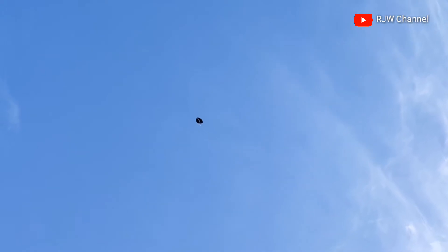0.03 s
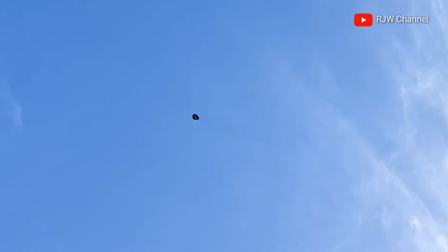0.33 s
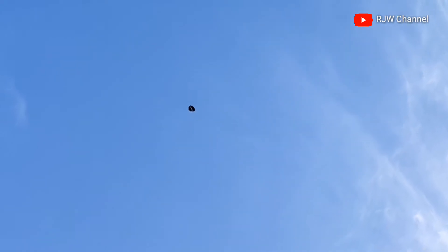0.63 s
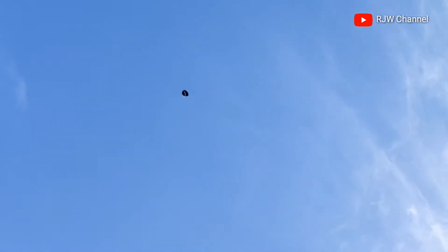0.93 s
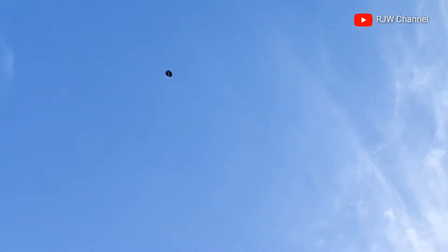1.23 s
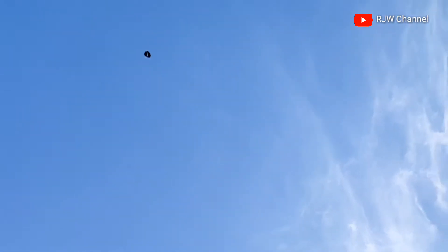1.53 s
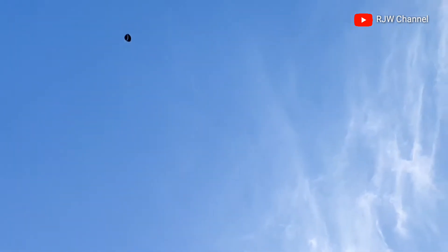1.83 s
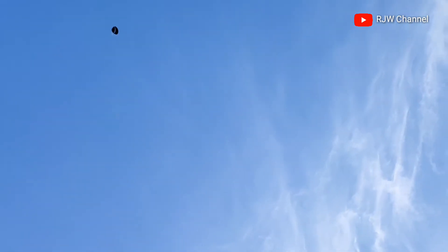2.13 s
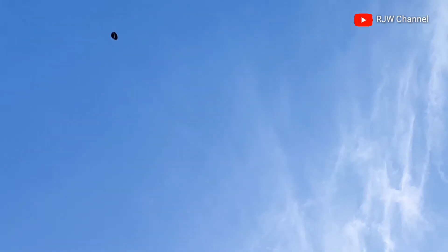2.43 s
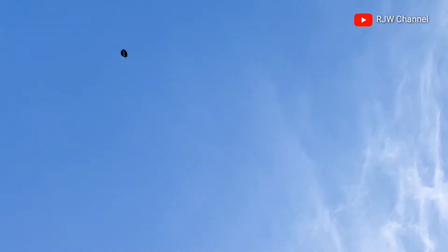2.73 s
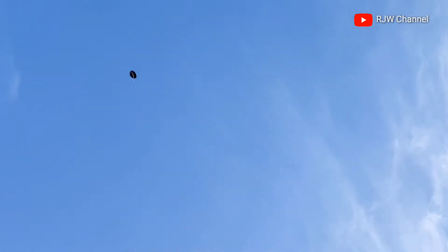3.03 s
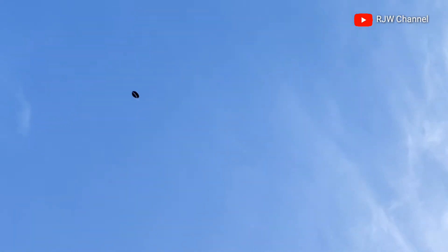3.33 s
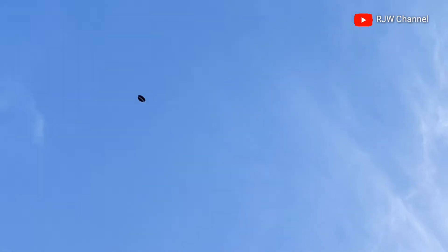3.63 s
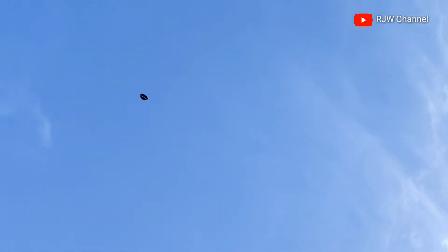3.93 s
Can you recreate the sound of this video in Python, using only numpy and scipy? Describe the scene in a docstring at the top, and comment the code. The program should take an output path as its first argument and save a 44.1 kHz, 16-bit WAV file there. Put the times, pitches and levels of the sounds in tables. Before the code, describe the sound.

Fast fluttering whoosh of a kite in flight, with low wind rumble on the microphone.

```python
"""Open ground in a gusty wind, a two-port microphone far below a rotor kite. The kite spins about
twelve times a second; each of its two edges whooshes and whistles once a turn, and the ground echoes it.
Right at the microphone, gusts buffet both ports, mostly the left, which crackles and now and then
overloads. Twice the wind whistles across the right port. A thin hiss lies over everything."""
import sys
import numpy as np
from scipy import signal
from scipy.fft import rfft, irfft
from scipy.io import wavfile
from scipy.ndimage import uniform_filter1d

SR = 44100
rng = np.random.default_rng(int(sys.argv[2]) if len(sys.argv) > 2 else 0)


def wrap_up_sound(samples):
    """Save the sound to the file named by the first command line argument, as 16-bit audio."""
    columns = np.atleast_2d(samples).T
    # keep every value between -1 and 1, then stretch to whole-number steps
    tamed = np.clip(columns, -1, 1)
    steps = np.round(tamed * 32767).astype(np.int16)
    wavfile.write(sys.argv[1], SR, steps)


N = 176400
TIME = np.arange(N) / SR

# Rotation of the kite: t/s, angle/turns
KITE_TURNS = [(0, -.53), (.4595, 5), (1.687, 20), (2.5102, 30), (4, 47.96)]
# Airspeed over the kite, heard as pitch: t/s, pitch factor
AIRSPEED_PITCH = [(0, 1), (1.1, 0.88), (1.7, 1), (2.35, 0.79), (2.7, 0.9), (3.1, 0.97), (3.6, 0.98),
                  (4, 0.96)]
# Each edge's whoosh, body and treble: place in the turn/turns, length/turns, level/dB
BODY_PASSES = [(-.015, 0.12, 9), (.475, 0.14, 6.5)]
TREBLE_PASSES = [(.01, 0.15, 5.9), (.515, 0.11, 9.9)]
# Colour of the whoosh: f/Hz, level/dB
BODY_SPECTRUM = [(300, -16.5), (600, -2), (880, 2.5), (1120, 2), (1350, -18.5), (1700, -19), (2500, -38.5)]
TREBLE_SPECTRUM = [(800, -25), (1300, -3), (1650, -2), (1950, 0), (2280, .5), (2480, -6), (2700, -13),
                   (3300, -12.5), (4200, -26), (7000, -36)]
# Swell of the whoosh: t/s, level/dB
BODY_LEVEL = [(0, -38.5), (.2, -43.5), (.55, -47.5), (.8, -45), (1.15, -44.5), (1.3, -48), (1.45, -49.5),
              (1.72, -49), (1.9, -47.5), (2.1, -42.5), (2.4, -46.5), (2.62, -37), (2.95, -46), (3.2, -40),
              (3.55, -38), (3.8, -43.5), (4, -41.5)]
TREBLE_LEVEL = [(0, -47.5), (.2, -49.5), (0.549, -58.5), (.8, -51), (1.301, -55.5), (1.45, -50),
                (1.75, -60.5), (2.1, -47.5), (2.62, -52), (2.95, -50), (3.199, -48.5), (3.55, -50),
                (4, -62.5)]
# Edge whistles, two on the second edge: place/turns, length/turns, top f/Hz at pitch factor 1,
# pitch arch/turns^-2, fuzz width/Hz, level/dB, octave/dB, relative pitch wander, level spread/dB
EDGE_WHISTLES = [(-.03, .095, 1145, 7.5, 190, 2, -21, .008, 1),
                 (.475, .085, 1215, 5, 320, -2.5, -27, .015, 1),
                 (.475, .06, 1420, 6, 300, -14, -35, .04, 3)]
# Swell of the edge whistles: t/s, level/dB
EDGE_WHISTLE_LEVEL = [(0, -51), (1.15, -51), (1.7, -56.5), (2.25, -46), (2.6, -36), (2.8, -39.5),
                      (3.0, -32), (3.17, -29), (3.32, -34.5), (3.51, -26.5), (3.6, -34), (3.76, -36),
                      (4, -45.5)]
# Kite to left and right port: gain/dB, direct delay/ms, ground echo delay/ms, ground echo/dB
PORT_PATHS = [(0, 0.09, 8.33, -6), (-4.5, 0, 5.5, -9)]

# Wind pressure on each port: t/s, level/dB
LEFT_GUSTS = [(0.0, -14), (0.04, -9.5), (0.05, -12), (0.16, -8), (0.24, -13), (0.55, -8.5), (0.61, -13),
              (0.64, -11.5), (0.67, -21), (0.7, -15.0), (0.8, -28.5), (0.87, -14), (0.92, -27.5),
              (1.0, -18.5), (1.03, -45), (1.08, -12), (1.12, -34), (1.14, -25.5), (1.2, -37.5), (1.27, -22),
              (1.3, -30), (1.35, -23), (1.39, -20.5), (1.42, -11.5), (1.45, -23.5), (1.5, -15.5),
              (1.58, -15), (1.62, -13), (1.67, -14.5), (1.69, -12), (1.77, -20.5), (1.78, -14.5),
              (1.82, -10), (1.84, -18), (1.95, -16), (2.0, -20.5), (2.15, -14), (2.23, -18.5), (2.35, -9.5),
              (2.39, -19), (2.47, -14.5), (2.6, -24), (2.67, -8.5), (2.72, -6), (2.75, -11.5), (2.78, -8.5),
              (2.94, -10), (3.09, -8.5), (3.11, -22), (3.14, -11.5), (3.23, -24.5), (3.25, -12.5),
              (3.33, -25.5), (3.36, -14.5), (3.44, -16.5), (3.56, -3.5), (3.64, -11.5), (3.68, -17.5),
              (3.79, -12.5), (3.81, -18), (3.86, -9.5), (3.99, -12.5)]
RIGHT_GUSTS = [(0.0, -27), (0.22, -31), (0.27, -20), (0.48, -20), (0.59, -32), (0.7, -17.5), (0.81, -32.5),
               (0.89, -10.5), (0.92, -28.5), (1.06, -12), (1.12, -29), (1.17, -24.5), (1.19, -19),
               (1.23, -21.5), (1.7, -18), (1.74, -23), (1.81, -14), (1.95, -13), (2.02, -24.5), (2.06, -13),
               (2.12, -19.5), (2.16, -8), (2.21, -22.5), (2.28, -23), (2.31, -32), (2.4, -16), (2.53, -39),
               (2.57, -19.5), (2.73, -23), (2.76, -31), (2.86, -12.5), (3.14, -14.5), (3.26, -30),
               (3.47, -22), (3.68, -33.5), (3.73, -19), (3.81, -19.5), (3.85, -56), (3.88, -19),
               (3.99, -38)]
# Colour of the buffeting: f/Hz, level/dB
LEFT_BUFFET_SPECTRUM = [(20, -18.5), (40, -38), (65, -30), (90, -2), (125, 3), (180, 0), (250, -3.5),
                        (350, -8.5), (500, -15), (700, -25), (1000, -36.5), (1500, -63.5), (3200, -68),
                        (7000, -78)]
RIGHT_BUFFET_SPECTRUM = [(20, -22.5), (40, -17.5), (65, -20.5), (90, -2), (125, 6.5), (180, -5.5),
                         (250, -6.5), (350, -12), (500, -19.5), (700, -31), (1000, -38.5), (1500, -48.5),
                         (3200, -68.5), (7000, -77.5)]
# Hard slaps of air on the left port: t/s, signed height, half length/ms, relative crackle/dB
AIR_SLAPS = [(.038, -0.96, 0.53, -26), (.0932, 0.82, 0.47, -12), (0.1445, 1, 0.47, -6.5),
             (0.1721, -0.95, 0.73, -2), (.3747, -1.24, 0.43, -6), (0.4845, 1.1, 0.67, -1),
             (0.5084, 1.07, 0.49, -5), (0.5497, 0.99, 0.66, -25), (2.7131, -0.78, 0.45, -15),
             (2.7157, 0.97, 0.46, -14), (2.7255, -1.36, 0.68, -14), (2.7749, 0.99, 0.39, -1.5),
             (2.7965, -1.2, 0.73, -8), (3.5219, -0.9, .8, -13), (3.566, -1.2, 0.72, -9),
             (3.5743, -1.17, 0.67, -5.5), (3.6041, 1.03, 0.62, -22), (3.6335, 0.74, 0.48, -11),
             (3.6373, -1.5, 0.84, -7), (3.6641, 1.26, 0.44, -0.5)]
# Colour of the crackle: f/Hz, level/dB
CRACKLE_SPECTRUM = [(300, 3.5), (1200, 6), (2000, -2.5), (3500, -18.5), (5500, -28), (7500, -28)]
# Wind across the right port, one table a whistle: t/s, f/Hz, level/dB
PORT_WHISTLES = [
    [(2.465, 325, -27), (2.492, 344, -17.5), (2.515, 316, -20), (2.528, 283, -12.5), (2.545, 318, -20),
     (2.575, 328, -32)],
    [(3.235, 319.5, -29), (3.258, 313, -12.5), (3.29, 314.7, -20.5), (3.32, 296.6, -23.5),
     (3.34, 256, -21.5), (3.36, 305, -14.5), (3.38, 323, -25.5), (3.43, 281, -24)],
]

# Colour of the hiss at each port: f/Hz, level/dB
LEFT_HISS_SPECTRUM = [(300, -3), (1300, -5.5), (2300, -8.5), (2800, -6.5), (3600, -14), (4400, -10),
                      (5400, -4.5), (5700, -5.5), (6100, 0.5), (6800, 4.5), (7400, -2), (7800, -12)]
RIGHT_HISS_SPECTRUM = [(300, 14), (1300, 7.5), (2300, -15), (2800, -12.5), (3600, -20.5), (4300, -21.5),
                       (5000, -16), (5700, -9.5), (6100, -7), (6800, -0.5), (7400, -1.5), (7800, -17.5)]
# Swell of the whole hiss, and of its lower treble against the rest: t/s, level/dB
HISS_SWELL = [(0, -47.5), (.5, -47.5), (.7, -47.5), (1.48, -50), (1.56, -46.5), (1.9, -43), (2.4, -49),
              (2.7, -51.5), (3.05, -50), (3.55, -45.5), (3.71, -55.5), (4, -50.5)]
HISS_LOWER_TREBLE = [(0, 6), (.55, -2.5), (1.48, 1.5), (1.56, -12.5), (2.5, -3.5), (2.6, 5), (3.1, -0.5),
                     (3.6, -2.5), (4, -5.5)]


def kite():
    """The kite from the ground: a fluttering whoosh, with a whistle that swells out of it."""
    body = from_afar(whoosh(BODY_PASSES, BODY_SPECTRUM, BODY_LEVEL), scatter_db=0.5)
    treble = mottled(whoosh(TREBLE_PASSES, TREBLE_SPECTRUM, TREBLE_LEVEL))
    treble = from_afar(treble, scatter_db=-8) * amp([[-1.5], [0]])  # duller on the left
    return body + treble + from_afar(edge_whistle(), scatter_db=-11.5)


def whoosh(passes, spectrum, level, spread_db=1):
    """A short rush of turbulence from each edge, once a turn."""
    swings = sum(amp(db) * swing(place, length) for place, length, db in passes)
    return unit(noise(spectrum) * swings * amp(spread_db * drift(8.9))) * amp(curve(level))


def mottled(treble, depth_db=2.2):
    """The whoosh's treble takes another colour on every pass."""
    bands = signal.stft(treble, SR, nperseg=512)[2]
    patches = uniform_filter1d(rng.standard_normal(bands.shape), size=3, axis=0)
    patches = unit(uniform_filter1d(patches, size=5, axis=1))
    return signal.istft(bands * amp(depth_db * patches), SR, nperseg=512)[1][:N]


def edge_whistle(wander_hz=20, lead_turns=0.015, octave_spread_db=3.5):
    """Each edge sheds vortices: a fuzzy tone that rises and falls with the swing, no two turns alike."""
    out, speed = np.zeros(N), curve(AIRSPEED_PITCH)
    for place, length, top_hz, arch, width_hz, db, octave_db, wander, spread_db in EDGE_WHISTLES:
        waver = 1 + wander * drift(wander_hz) + .025 * drift(203)
        hz = top_hz * speed * waver / (1 + arch * (turns_from_pass(place) + lead_turns) ** 2)
        phase = 2 * np.pi * np.cumsum(hz) / SR
        fuzz = drift(width_hz / 2) * np.cos(phase) + drift(width_hz / 2) * np.sin(phase)
        octave = amp(octave_db + octave_spread_db * drift(wander_hz)) * np.sin(2 * phase)
        tone = np.sin(phase) + .65 * fuzz + octave
        out += tone * swing(place, length) * amp(db + spread_db * drift(wander_hz))
    return unit(out) * amp(curve(EDGE_WHISTLE_LEVEL))


def swing(place, length):
    """Loudness of an edge as it comes round."""
    return np.exp(-.5 * abs(turns_from_pass(place) / length) ** 2.4)


def turns_from_pass(place):
    """Turns since (or until) an edge swings through the wind."""
    return (curve(KITE_TURNS) - place + .5) % 1 - .5


def from_afar(source, scatter_db, t60_s=0.039):
    """The kite reaches each port directly, off the ground, and scattered by the surroundings."""
    t, ports = TIME[:SR // 2], []
    for gain_db, direct_ms, ground_ms, ground_db in PORT_PATHS:
        tail = rng.standard_normal(len(t)) * amp(-60 * t / t60_s)
        scatter = amp(scatter_db) * signal.fftconvolve(source, tail / np.linalg.norm(tail))[:N]
        ground_echo = amp(ground_db) * delayed(source, ground_ms)
        ports.append(amp(gain_db) * (delayed(source, direct_ms) + ground_echo + scatter))
    return np.array(ports)


def buffeting(gusts, spectrum, gain_db, eddy_db=3.5, eddy_hz=50.7, usual_gust_db=-12.5):
    """Lumpy turbulence right on one port; stronger gusts are brighter."""
    level = curve(gusts)
    eddies = rng.standard_normal(N) * amp(eddy_db * drift(eddy_hz))
    hz, t, bands = signal.stft(eddies, SR, nperseg=2048)
    octaves = np.clip(np.log2((hz + 1) / 140), -2, 2)[:, None]  # the colour tilts about 140 Hz
    tilt_db = 0.22 * octaves * (np.interp(t, TIME, level) - usual_gust_db)
    rumble = signal.istft(bands * amp(colour(spectrum, hz)[:, None] + tilt_db), SR, nperseg=2048)[1][:N]
    steady = rumble / np.sqrt(uniform_filter1d(rumble ** 2, size=1800) + 1e-20)
    return saturate(steady * amp(level + gain_db))


def saturate(pressure, limit=.93, knee=6):
    """The microphone gives way, rounding off the strongest swings."""
    return pressure / (1 + abs(pressure / limit) ** knee) ** (1 / knee)


def slapped(rumble, spit_db=-27, spit_ms=1.8):
    """Single sharp pressure swings break into the rumble, each with a spit of crackle."""
    out, spit = rumble, np.zeros(N)
    for at_s, height, half_ms, crackle_db in AIR_SLAPS:
        ms = (TIME - at_s) * 1000
        near = abs(ms) < 30
        u = ms / half_ms
        grip = near * np.exp(-u ** 2 / 4)  # how far the slap displaces the rumble
        out = out * (1 - grip) + height * (1 - .5 * u ** 2) * grip
        spit[near] += amp(crackle_db) * np.exp(-abs(ms[near]) / spit_ms)
    return out + amp(spit_db) * spit * noise(CRACKLE_SPECTRUM)


def port_low_cut(rumble, hz=42):
    """The port passes little of the deepest rumble."""
    return signal.sosfiltfilt(signal.butter(2, hz, "highpass", fs=SR, output="sos"), rumble)


def crackle(rumble, threshold=.5, level_db=-28):
    """The crests of strong buffeting tear into fine crackle."""
    crests = np.clip((abs(rumble) - threshold) / (1 - threshold), 0, 1)
    return amp(level_db) * crests * noise(CRACKLE_SPECTRUM)


def port_whistle(octaves_db=(-13.5, -27), waver=0.0246):
    """Wind across the right port: a wavering edge tone with a weak octave."""
    out = np.zeros(N)
    for whistle, octave_db in zip(PORT_WHISTLES, octaves_db):
        phase = 2 * np.pi * np.cumsum(curve(whistle) * (1 + waver * drift(80))) / SR
        tone = unit(np.sin(phase) + amp(octave_db) * np.sin(2 * phase))
        sounding = uniform_filter1d(1. * ((TIME > whistle[0][0]) & (TIME < whistle[-1][0])), size=300)
        out += sounding * amp(curve(whistle, column=2)) * tone
    return out


def hiss(patchy_db=3.5, lower_hz=3670, lower_octaves=0.69):
    """Thin, patchy background hiss, unrelated between the ports."""
    ports = np.array([noise(LEFT_HISS_SPECTRUM), amp(0.5) * noise(RIGHT_HISS_SPECTRUM)])
    hz, t, bands = signal.stft(ports, SR, nperseg=1024, noverlap=768)
    patches = uniform_filter1d(rng.standard_normal(bands.shape), size=5, axis=1)
    patches = unit(uniform_filter1d(patches, size=25, axis=2))
    lower_treble = np.exp(-.5 * (np.log2((hz + 1) / lower_hz) / lower_octaves) ** 2)[:, None]
    bands *= amp(patchy_db * patches + lower_treble * np.interp(t, TIME, curve(HISS_LOWER_TREBLE)))
    return signal.istft(bands, SR, nperseg=1024, noverlap=768)[1][:, :N] * amp(curve(HISS_SWELL))


def amp(db):
    """Decibels to gain."""
    return 10 ** (np.asarray(db) / 20)


def unit(x):
    """Scales to rms 1."""
    return x / np.sqrt(np.mean(x ** 2) + 1e-20)


def curve(points, column=1):
    """One column of a time table at every sample."""
    table = np.transpose(points)
    return np.interp(TIME, table[0], table[column])


def colour(points, hz):
    """Reads a spectrum on a log-frequency axis."""
    f, db = np.transpose(points)
    return np.interp(np.log(hz + 1), np.log(f + 1), db)


def noise(spectrum):
    """Steady noise of a given colour."""
    gain = amp(colour(spectrum, np.fft.rfftfreq(N, 1 / SR)))
    return unit(irfft(rfft(rng.standard_normal(N)) * gain, N))


def drift(hz):
    """Random wander up to about a given rate."""
    gain = np.exp(-(np.fft.rfftfreq(N, 1 / SR) / hz) ** 2)
    return unit(irfft(rfft(rng.standard_normal(N)) * gain, N))


def delayed(x, ms):
    """Delay, interpolated between samples."""
    return np.interp(TIME - ms / 1000, TIME, x, left=0)


def lowpass(x, hz):
    """Steep band limit on both channels."""
    return signal.oaconvolve(x, signal.firwin(601, hz, window=("kaiser", 9), fs=SR)[None], "same")


def scene():
    """Wind right at the ports, the kite high overhead, hiss behind both."""
    left = port_low_cut(slapped(buffeting(LEFT_GUSTS, LEFT_BUFFET_SPECTRUM, gain_db=0.5)))
    right = buffeting(RIGHT_GUSTS, RIGHT_BUFFET_SPECTRUM, gain_db=-1) + port_whistle()
    return np.array([left + crackle(left), right]) + kite() + hiss()


def record(dry):
    """A narrow-band microphone; the hardest slaps clip; a faint noise floor reaches above its band."""
    floor = amp(-87) * rng.standard_normal((2, N))
    clipped = np.clip(lowpass(dry, hz=7900), -1, 1)
    return lowpass(clipped + floor, hz=15600)


dry = scene()
out = record(dry)
wrap_up_sound(out)
```